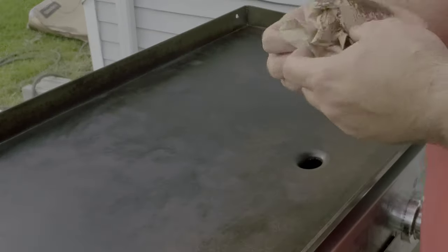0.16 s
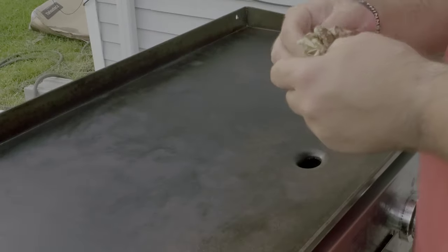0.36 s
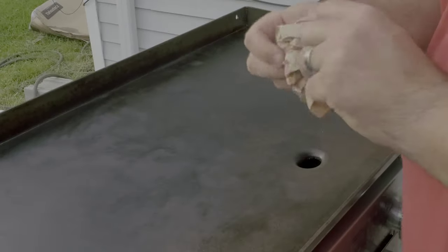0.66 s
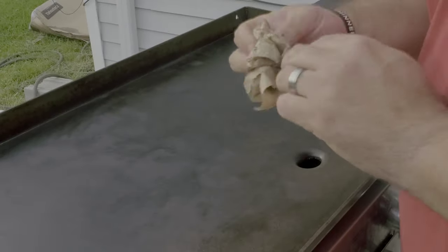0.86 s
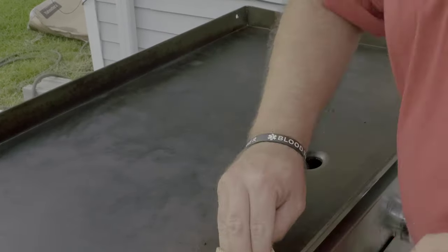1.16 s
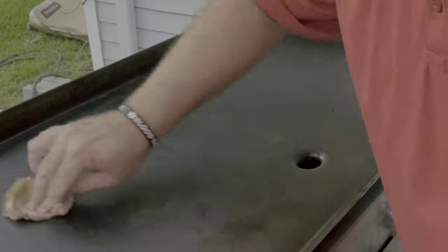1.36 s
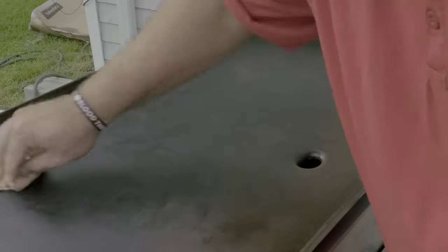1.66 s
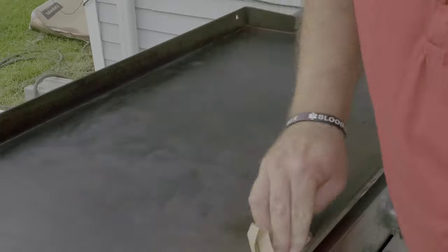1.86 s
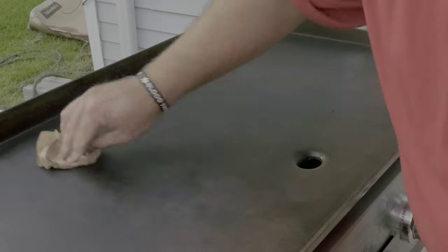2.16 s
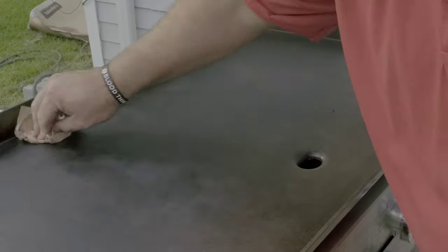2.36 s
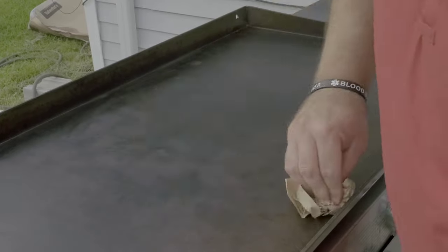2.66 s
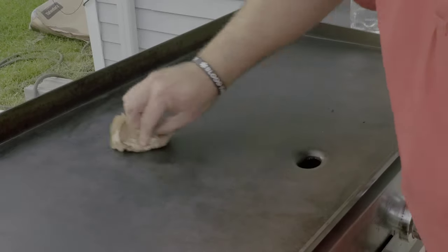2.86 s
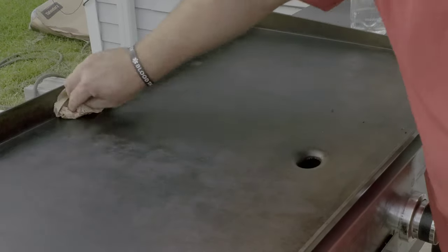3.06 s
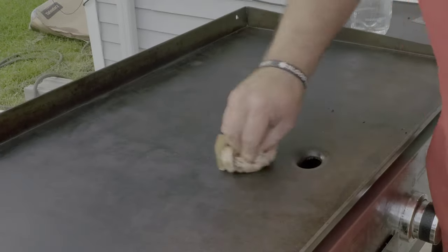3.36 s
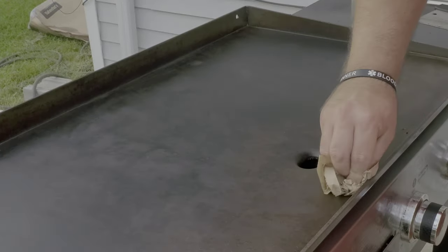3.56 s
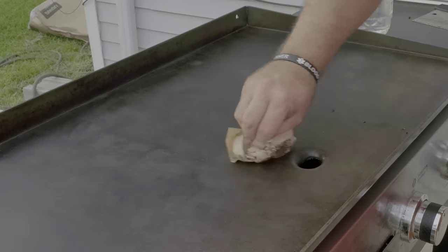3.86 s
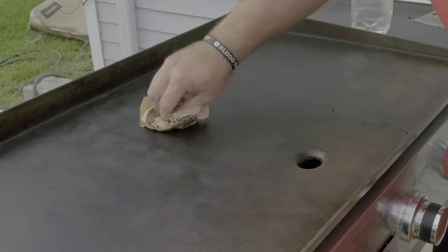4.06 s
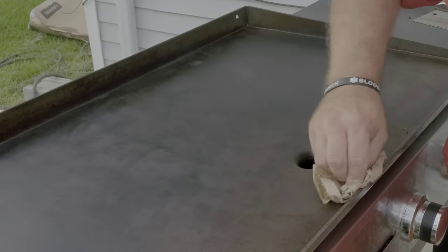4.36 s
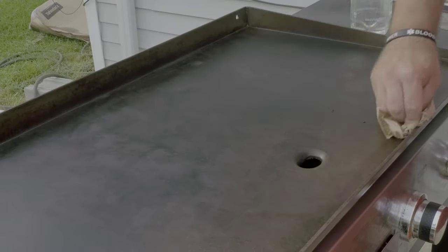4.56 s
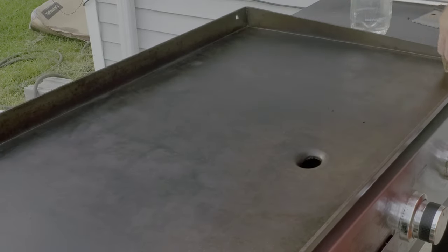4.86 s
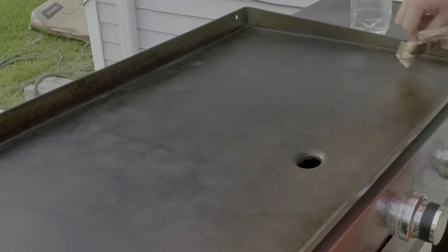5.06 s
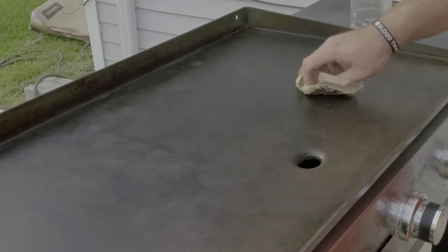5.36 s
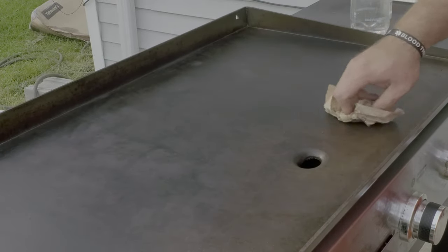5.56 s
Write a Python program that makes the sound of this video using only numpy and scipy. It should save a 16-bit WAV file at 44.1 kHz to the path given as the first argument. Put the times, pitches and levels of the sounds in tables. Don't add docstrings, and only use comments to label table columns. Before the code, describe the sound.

Close, dry outdoor sound: two hands crush a wad of paper towel with dense crackles, snaps and small crunches for just over a second. The wad then meets a steel cooking plate and rubs in short alternating strokes, each a breathy, papery hiss with a low scrape and slight shaking of the plate. A few creases still snap; later strokes become shorter and weaker over a very faint open-air floor.

```python
import sys
import numpy as np
from scipy import signal
from scipy.io import wavfile
from scipy.ndimage import uniform_filter1d, map_coordinates

SR = 44100
rng = np.random.default_rng(int(sys.argv[2]) if len(sys.argv) > 2 else 0)


def convert_level_to_amplitude(level_db):
    exponent = np.asarray(level_db, float) / 20
    return 10 ** exponent


def master_out(mix):
    frames = np.transpose(np.atleast_2d(mix))
    ceiling = np.clip(frames, -1, 1)
    pcm = np.round(ceiling * 32767).astype(np.int16)
    wavfile.write(sys.argv[1], SR, pcm)


N = 252252


def unit(x):
    return x / np.sqrt(np.mean(x ** 2) + 1e-20)


def along(points, hz):
    f, db = np.transpose(points)
    return np.interp(np.log(hz + 1), np.log(f + 1), db, left=-120, right=-120)


def steady(points):
    return lambda hz, t: along(points, hz) + 0 * t


def wobble(rate):
    knots = rng.standard_normal(int(N * rate / SR) + 4)
    return map_coordinates(knots, [np.arange(N) * rate / SR])


def slips(jerk_db, clump_db):
    size_db = jerk_db * wobble(900) + clump_db * wobble(70)
    return unit(rng.standard_normal(N) * convert_level_to_amplitude(size_db))


def tears(rate, size_db):
    lets_go = rng.random(N) < rate / SR
    return lets_go * rng.uniform(-0.98, 1, N) * convert_level_to_amplitude(size_db)


def shaped(x, gain_db, patchy_db):
    hz, t, z = signal.stft(x, SR, nperseg=512)
    patches = rng.standard_normal(z.shape)
    for axis in (0, 1):
        patches = uniform_filter1d(patches, size=14, axis=axis)
    gain = convert_level_to_amplitude(gain_db(hz[:, None], t) + patchy_db * unit(patches))
    gain = gain / np.sqrt(np.mean(gain ** 2, axis=0))
    return signal.istft(z * gain, SR, nperseg=512)[1][:N]


def bumps(rows, sudden=1):
    t = np.arange(0, N / SR, .001)
    s, length, *layers = np.transpose(rows)[..., None]
    bump = np.exp(-(2 * (t - s) / length * np.where(t < s, sudden, 1)) ** 2)
    return [np.interp(np.arange(N) / SR, t, np.sum(db * bump, axis=0)) for db in layers]


# frequency in Hz, density in dB per Hz.
AIR = [(28, -38), (84, 3.5), (274, -1.5), (500, -8.5), (4600, -12), (5750, 1), (7000, -11), (15700, -15)]


def air():
    return convert_level_to_amplitude(-79.5 + 0.8 * wobble(4.6)) * shaped(rng.standard_normal(N), steady(AIR), patchy_db=-2.5)


# frequency in Hz, density in dB per Hz.
RUMBLE = [(28, -36), (45, -11), (80, 1), (150, -5), (240, -4), (330, -27.5)]
DRUM = [(170, -35.5), (250, -3), (350, 4), (520, -0.5), (750, -5)]
# centre in seconds, length in seconds, extra rumble in dB, extra drum in dB.
LEANS = [(.48, 0.052, 3, 12), (1.1, 0.51, 1, 4), (1.28, 0.16, -2, -26), (1.58, 0.7, 1.5, 7),
         (2.38, 0.11, -2, 14), (2.51, 0.16, 2, 19), (2.74, 0.1, -2, 7.5), (2.95, 0.26, 4.5, 4),
         (3.36, 0.23, 7, -11), (3.79, 0.17, 1, 13), (3.94, 0.19, 8, 13), (4.14, 0.2, 6, 8),
         (4.66, 0.036, 13, 1), (5.04, 0.13, 4, 9.5), (5.61, 0.065, 4, 9)]


def plate(press_db, held):
    lean_db, push_db = bumps(LEANS)
    harder_db = press_db + 51
    rumble_db = -73 + 0.73 * harder_db + lean_db
    drum_db = -75 + 0.99 * harder_db + 10 * held + push_db + 0.5 * bumps(CRUNCHES)[0]
    rumble = convert_level_to_amplitude(rumble_db) * shaped(rng.standard_normal(N), steady(RUMBLE), patchy_db=-13.0)
    return rumble + convert_level_to_amplitude(drum_db) * shaped(slips(2, 2.2), steady(DRUM), patchy_db=3)


# frequency in Hz, density in dB per Hz.
BELLY = [(380, -32), (550, -6.5), (950, 5), (1400, -14)]
# centre in seconds, length in seconds, extra level in dB.
SCRAPES = [(.31, 0.071, 16), (.5, 0.027, 24), (.66, 0.12, 15), (.83, 0.055, 5), (1.55, 0.08, 11),
           (1.75, 0.33, 14), (2.33, 0.22, 12), (2.49, 0.062, 15), (3.32, 0.11, 23), (3.8, 0.17, 14.5),
           (3.92, 0.036, 22), (4.15, 0.17, 10), (5.6, 0.071, 7)]


def scrape(press_db):
    level_db = press_db - 19 + bumps(SCRAPES)[0]
    return convert_level_to_amplitude(level_db) * shaped(slips(1.1, 0.5), steady(BELLY), patchy_db=-0.5)


# centre in seconds, length in seconds,
# pitch in Hz, level in dB.
CAVITIES = [(1.483, .12, 4130, -48.5), (1.51, 0.28, 1250, -56), (2.072, .06, 8800, -69),
            (2.1, .09, 1500, -76.5), (2.45, 0.099, 8950, -71), (2.44, 0.054, 4500, -64),
            (3.34, 0.091, 7360, -51), (3.776, 0.28, 8950, -63), (3.75, 0.19, 4420, -55.5),
            (4.676, 0.27, 7970, -61), (4.8, 0.22, 10940, -71), (0.113, 0.085, 3160, -72),
            (2.3, .2, 1410, -62), (2.83, .07, 1410, -77)]


def cavities():
    q = 14
    hz, t, z = signal.stft(slips(1.5, 1.4), SR, nperseg=512)
    gain = 0
    for s, length, pitch_hz, db in CAVITIES:
        resonance = np.sqrt(SR * q / (np.pi * pitch_hz)) / (1 + (q * (hz[:, None] / pitch_hz - 1)) ** 2)
        gain = gain + convert_level_to_amplitude(db) * resonance * np.exp(-(2 * (t - s) / length) ** 4)
    return signal.istft(z * gain, SR, nperseg=512)[1][:N]


# start in seconds, peak in dB, pitch in Hz.
TICKS = [(0.326, -43, 6500), (.3785, -29, 8800), (0.5937, -32, 6550), (.7335, -29.5, 5800),
         (0.768, -28, 8460), (.7712, -29.5, 8200), (1.0374, -28, 8300), (1.2345, -31, 10000),
         (1.31, -38.5, 8500), (2.99, -25, 8500), (3.0085, -30.5, 8000), (3.2493, -40, 7000),
         (3.681, -38.5, 7000), (4.2065, -48, 9000), (5.0568, -36, 9540), (2.2145, -27, 8500)]


def ticks():
    out, t = np.zeros(N + SR), np.arange(100) / SR
    for (s, db, hz), turn in zip(TICKS, rng.random(len(TICKS))):
        u = t * hz / 1.3
        tick = np.sin(2 * np.pi * (hz * t + turn)) * u ** 2 * np.exp(2 - 2 * u)
        out[round(s * SR):][:len(t)] += convert_level_to_amplitude(db) * tick
    return out[:N]


TOUCHDOWN = 1.33
# start in seconds, peak in dB, pitch in Hz, crack in dB above the peak.
HAND_SNAPS = [(0.132, -29.5, 3180, -28), (0.1383, -17.5, 3640, -32), (0.049, -52, 3500, -20),
              (0.0687, -48, 3000, -20), (0.234, -42, 1490, -23), (0.2413, -44, 4000, -30),
              (0.2537, -27, 1380, -21), (0.327, -27, 1660, -22.5), (0.3982, -19.5, 2310, -15),
              (0.478, -32, 1410, -18), (0.548, -31, 2600, -11), (0.5943, -24.5, 2740, -7),
              (0.645, -40, 1360, -22), (0.6564, -28, 2360, -19), (0.679, -19, 2300, -5),
              (0.707, -20.5, 1360, -11), (0.733, -15, 3300, -13), (0.7663, -19, 1700, -13),
              (0.816, -13.5, 2200, -22.5), (0.8342, -15, 1560, -7), (0.846, -17, 2540, -17.5),
              (0.8596, -20, 2280, -2), (0.995, -16, 1760, -28), (1.0363, -22, 3000, -18),
              (1.1543, -23, 3620, -12), (1.2052, -29, 2540, -17), (1.234, -34, 1290, -7.5),
              (0.2586, -26, 1360, -13), (0.271, -26, 1100, -17), (0.307, -20.5, 1620, -17),
              (0.313, -34, 1800, -13), (0.349, -34, 1800, -6), (0.4892, -33, 1500, -13),
              (0.495, -27, 1280, -9), (0.638, -34, 1350, -14), (0.9128, -19.5, 2150, -10.5),
              (0.973, -23, 1910, -11.5), (0.98, -16.5, 2120, -10), (1.193, -25, 2200, -21),
              (1.261, -20.5, 1270, -13), (1.273, -27.5, 1420, -20)]
PLATE_SNAPS = [(1.31, -36, 1700, -12), (1.346, -29, 1900, -13), (1.6115, -24, 2500, 0),
               (1.617, -47, 1820, -3), (2.1465, -43, 1500, -6), (2.4875, -31, 2010, -6),
               (2.879, -34.5, 2000, -1), (2.948, -27, 1620, -20), (2.958, -23, 2010, -19),
               (2.962, -19.5, 2110, -20), (1.723, -25, 4430, -21), (1.73, -28, 1970, -12),
               (3.167, -28, 1290, -13), (3.181, -29.5, 2460, -28), (3.23, -38, 2300, -25),
               (3.249, -39, 2290, -15), (3.2845, -30, 1620, -6), (3.682, -28, 2220, -22),
               (3.91, -25.5, 1730, -17), (4.1145, -23, 4430, -19), (4.184, -36, 2530, -9),
               (4.2934, -19.5, 3340, -23), (4.4285, -15, 2800, -14), (4.491, -19, 2480, -21),
               (4.597, -19.5, 3230, -16), (4.965, -40, 2500, -10.5), (4.979, -36, 2000, -20),
               (4.9973, -28.5, 3090, -29), (5.0156, -28.5, 2300, -6), (5.031, -34, 1060, -20),
               (5.0277, -29.5, 2500, -18), (5.0428, -22.5, 2870, -16), (5.0566, -20.5, 2720, -6.5),
               (5.0784, -27, 3000, -28), (5.153, -42.5, 3500, -16), (5.4145, -24.5, 3300, -16),
               (5.4207, -41.5, 2500, -26)]
# start in seconds, peak in dB.
THUMPS = [
    (0.657, -30),
    (0.834, -24),
    (1.73, -46),
    (3.912, -36),
]


def swelling_ring(t, hz, cycles, turn):
    u = t * hz / cycles
    return np.sin(2 * np.pi * (hz * t + turn)) * u ** 3 * np.exp(3 - 3 * u)


def snaps():
    out, t = np.zeros(N + SR), np.arange(400) / SR
    rows = HAND_SNAPS + PLATE_SNAPS
    chance = rng.random((len(rows), 5))
    rasps = signal.lfilter(*signal.butter(4, 6500, fs=SR), rng.standard_normal((len(rows), len(t))))
    for (s, db, hz, crack_db), c, rasp in zip(rows, chance, rasps):
        held = s < TOUCHDOWN
        snap = swelling_ring(t, hz, 0.98, c[0])
        snap += convert_level_to_amplitude(crack_db + 10.0 - 5 * held) * swelling_ring(t, 5300 + 1300 * c[1], 0.67, c[1])
        snap += convert_level_to_amplitude(crack_db - 19 - 2 * held) * swelling_ring(t, 8300 + 2000 * c[2], 0.87, c[3])
        snap += convert_level_to_amplitude(-10.5) * swelling_ring(t, 1.44 * hz, 2.0, c[4])
        snap += convert_level_to_amplitude(-19 - 60 * t / 0.0044) * rasp
        snap = signal.lfilter(*signal.butter(3, [0.66 * hz, 10500], 'band', fs=SR), snap)
        out[round((s + .0004) * SR):][:len(t)] += convert_level_to_amplitude(db - 8.5) * snap
    for s, db in THUMPS:
        out[round(s * SR):][:len(t)] += convert_level_to_amplitude(db) * swelling_ring(t, 636, 0.46, 0.5)
    return out[:N]


def motions(rows, law, t):
    rise, fall, swell_db, follows, crease_db, crease_swell_db, crease_follows, *fine_db = law
    s, end, first_db, last_db, press_db = np.transpose(rows)[..., None]
    u = np.clip((t - s) / (end - s), 0, 1)
    edge = -rise * np.maximum(s - t, 0) - fall * np.maximum(t - end, 0)
    dull_edge = 0.79 * edge
    slide = (last_db - first_db) * (u - .5)
    arch = 4 * u * (1 - u)
    fizz = (first_db + last_db) / 2 + slide + swell_db * arch + edge
    body = press_db + follows * slide + dull_edge
    crease = press_db + crease_db + crease_follows * slide + crease_swell_db * arch + dull_edge
    fine = fizz + np.interp(u, [0, 0.66, 1], fine_db)
    return np.sum(convert_level_to_amplitude([fizz, body, crease, fine]) ** 2, axis=1)


# start in seconds, end in seconds,
# fibre fizz in dB at the start, at the end, pressure in dB.
RUSTLES = [(0.0, .12, -91, -92, -83), (.15, .21, -74.5, -84, -68.5), (.53, .625, -65, -79, -65),
           (1.18, 1.22, -63, -65, -53.5), (1.3, 1.35, -71, -57, -63.5), (1.65, 1.7, -75, -80, -69.5),
           (2.04, 2.12, -68, -72, -70), (2.42, 2.47, -69, -73, -58), (2.81, 2.86, -68, -86, -72),
           (3.19, 3.27, -70, -79, -72), (3.61, 3.65, -64, -69, -65.5), (4.06, 4.1, -60, -62, -66),
           (5.075, 5.21, -68, -89, -78.5), (5.365, 5.43, -88, -80.5, -81), (5.46, 5.52, -76, -73, -65)]
# rise in dB/s, fall in dB/s, fizz swell in dB, share of the fizz slide in the
# body, crease in dB over pressure, crease swell in dB, share of the fizz slide in the crease,
# fine hiss in dB over fizz at the start, at its top, at the end.
RUSTLING = (444, 455, 2, 0.81, -1, -2.5, 0.74, -17, -20, -32)
# time in seconds, opening in dB.
OPENING = [(0, -14), (.6, 5.5), (.95, -1.5), (1.04, -11), (1.1, -4), (1.35, -2), (1.55, 5.5), (2.38, 1),
           (2.5, 7), (2.75, 0.5), (3.33, 4), (3.5, -3.5), (3.8, 1), (4.05, 4), (4.6, -0.5), (4.78, -17.5),
           (5.0, -8.5), (5.6, -5.5)]


def effort(*kinds):
    t = np.arange(0, N / SR, .001)
    power = sum(motions(rows, law, t) for rows, law in (*kinds, (RUSTLES, RUSTLING)))
    opening_db = np.interp(t, *np.transpose(OPENING))
    db = 10 * np.log10(power + 1e-11) + np.outer([0, 0, -0.29, 1], opening_db)
    return [np.interp(np.arange(N) / SR, t, d) for d in db]


# frequency in Hz, density in dB per Hz.
FINE = [(8200, -56.5), (9800, -1), (12000, -1.5), (14000, -3.5), (15600, -7.5)]
# time in seconds, resonance in Hz.
FINGERS = [(0, 11000), (1.0, 11000), (1.25, 9800), (1.42, 10200), (1.57, 11200), (1.78, 12500),
           (1.92, 10200), (2.2, 10800), (2.36, 12200), (2.5, 12700), (2.72, 10300), (2.95, 10800),
           (3.13, 12400), (3.32, 9900), (3.52, 11000), (4.3, 11300), (4.8, 11000), (5.6, 10300)]


def airy(tilt_db):
    def octaves_above(hz, edge_hz):
        return np.log2(np.maximum(hz, edge_hz) / edge_hz)

    def colour(hz, t):
        slit_hz = np.interp(t, *np.transpose(FINGERS))
        slit_db = 9 / (1 + ((hz - slit_hz) / 1700) ** 2)
        opening_db = 0.8 * np.interp(t, *np.transpose(OPENING))
        tilt = tilt_db * octaves_above(hz, 13200) + opening_db * octaves_above(hz, 11000)
        return along(FINE, hz) + slit_db + tilt

    return colour


def moving(points, t_grip, centre_hz, width_hz):
    def colour(hz, t):
        off = (hz - np.interp(t, t_grip, centre_hz)) / width_hz
        return along(points, hz) - 10 * np.log10(0.028 + 1 - 1 / (1 + off ** 2))

    return colour


# frequency in Hz, density in dB per Hz.
FIZZ = [(4500, -32.5), (6200, 1), (9600, 0), (11000, -19.5)]
CREASE = [(1800, -27.5), (2600, -5), (5700, 1.5), (7500, -39.5)]
# time in seconds, resonance in Hz of the hollow under the hand, of the pockets.
GRIP = [(0, 8750, 4020), (1.0, 8440, 4010), (1.15, 7500, 3400), (1.55, 7850, 4400), (1.78, 6170, 4860),
        (1.92, 8000, 4170), (2.25, 8400, 4170), (2.5, 6440, 4480), (2.65, 8700, 4650), (3.0, 7960, 4170),
        (3.3, 7040, 4100), (3.5, 8700, 4330), (3.8, 8500, 4050), (4.0, 6500, 4650), (4.28, 8740, 3870),
        (4.5, 5800, 3850), (5.1, 6920, 3200), (5.6, 8000, 4260)]
# centre in seconds, length in seconds, extra wad and crease in dB, extra fizz in dB.
CRUNCHES = [(0.171, 0.024, 9.5, 8), (0.262, 0.018, 13, 10), (0.309, 0.025, 8, 10.5),
            (0.325, 0.031, 5.5, 6.5), (0.379, 0.0053, 12, 10.5), (0.402, 0.021, 9.5, 6),
            (0.472, 0.0057, 1, 6), (0.494, 0.015, 8.5, 7), (0.644, 0.02, 5.5, 2.5), (0.658, 0.011, 2, 5.5),
            (0.774, 0.014, 5, 10), (0.823, 0.04, 4, 5), (0.855, 0.037, 1, 3), (0.914, 0.0084, 8, 14),
            (0.988, 0.04, -1.5, 3.5), (1.038, 0.0062, -1, 13), (1.261, 0.015, 4.5, 5.5),
            (1.276, 0.0042, 0, -2), (1.617, 0.014, 12, 6), (1.994, 0.01, 6, -13), (2.22, 0.057, 7.5, 5.5),
            (2.492, 0.036, 8, 3.5), (2.957, 0.036, 7, 2.5), (3.167, 0.02, 10, 4), (3.328, 0.063, 2.5, 3),
            (3.52, 0.0099, 0, 6), (3.918, 0.0096, 4, 8), (4.5, 0.018, 7, 3), (5.044, 0.034, 1.5, -6)]
# centre in seconds, length in seconds, extra crease in dB, extra wad in dB.
POCKETS = [(.3, 0.2, -1.5, 3.5), (.45, 0.079, 5, 5), (.95, 0.055, 4, -4.5), (1.02, 0.11, 3.5, 0.5),
           (1.12, 0.092, 7, -1.5), (1.25, 0.04, 6, -0.5), (1.46, 0.059, 2, -2), (1.58, 0.12, 2, -7.5),
           (1.79, 0.1, 5.5, 1), (1.89, 0.095, 8, 5.5), (2.09, 0.07, 7, -8), (2.2, 0.24, -4.5, -7),
           (2.3, 0.06, 1, -1.5), (2.54, 0.056, 5, 5), (2.64, 0.048, 6.5, 2), (2.75, 0.079, 1, -3),
           (2.955, 0.02, 0, 6.5), (3.1, 0.28, -2.5, -4.5), (3.167, 0.017, -15, -3), (3.21, 0.079, -3, 6),
           (3.33, 0.096, -1, 5.5), (3.45, 0.18, 6, 4), (3.6, 0.11, 1, -3), (3.77, 0.11, 4.5, 3),
           (4.0, 0.033, 0.5, 4.5), (4.22, 0.13, 1.5, -7.5), (4.4, 0.15, 2, 1), (4.7, 0.1, 2, 2),
           (4.9, 0.15, -1, -4.5), (5.035, 0.06, -4, 4.5), (5.135, 0.03, 12, 2), (5.18, .06, 10.5, -2),
           (5.38, 0.056, 7, -4), (5.48, 0.1, 3.5, -14.5), (5.6, 0.23, -0.5, 2.5)]
# centre in seconds, length in seconds, extra fizz in dB, extra fine hiss in dB.
PALM = [(.05, .12, 1, -8), (.28, 0.042, 4, 11), (.43, 0.076, 2, 2), (.68, 0.081, 2.5, -3),
        (.75, 0.048, 6, 3), (.95, .03, -3, -15), (1.01, 0.071, 0.5, 8), (1.12, 0.092, 2, -5),
        (1.25, .05, 2, -4), (1.42, 0.15, 4, 3), (1.675, 0.035, 1, 3), (1.8, 0.067, 1, 2),
        (1.97, 0.053, -3, -4), (2.08, 0.043, 2, 7), (2.3, 0.1, 1, 1.5), (2.54, .08, 3, 7),
        (2.68, 0.067, 1.5, -6), (2.92, 0.094, -1, 4), (3.1, .08, 4, -3), (3.36, 0.11, 0, -2),
        (3.56, 0.12, -0.5, 10), (3.63, .04, -2, 6), (3.78, 0.2, -1.5, -7), (4.0, 0.042, 0.5, -8),
        (4.14, .05, -5, -9), (4.28, 0.2, 4.5, -4), (4.55, .12, -0.5, -3), (4.8, 0.13, -1, -3),
        (4.95, .06, -2.5, -11), (5.12, .06, 1, 1), (5.47, .05, 3.5, 1), (5.55, 0.043, 7, 13),
        (4.08, 0.071, -2.5, 8)]


def towel(levels, wad, rub, tear_rate, tear_db, patchy_db, width_hz, tilt_db):
    fizz_db, body_db, crease_db, fine_db = levels
    t_grip, hollow_hz, pocket_hz = np.transpose(GRIP)
    low_db, high_db = bumps(CRUNCHES, sudden=0.97)
    pocket_db, wad_db = bumps(POCKETS)
    lift_db, slit_db = bumps(PALM)

    def part(db, colour, dull_db):
        friction = unit(rub + tears(tear_rate, tear_db - dull_db))
        return convert_level_to_amplitude(db) * shaped(friction, colour, patchy_db)

    hollow = moving(FIZZ, t_grip, hollow_hz, width_hz)
    pockets = moving(CREASE, t_grip, pocket_hz, 0.8 * width_hz)
    high = part(fizz_db + lift_db, hollow, dull_db=-2.5)
    high += part(fine_db + slit_db, airy(tilt_db), dull_db=1)
    low = part(body_db + wad_db, steady(wad), dull_db=1.5)
    low += part(crease_db + pocket_db, pockets, dull_db=-2.5)
    return convert_level_to_amplitude(low_db) * low + convert_level_to_amplitude(high_db) * high


# frequency in Hz, density in dB per Hz.
WAD_SQUEEZED = [(380, -8), (600, -1.5), (1000, 0), (1300, 4), (2200, 4.5), (3200, -5.5), (4200, -30.5)]
# start in seconds, end in seconds,
# fibre fizz in dB at the start, at the end, pressure in dB.
SQUEEZES = [
    (.256, .44, -64.5, -58, -55.5),
    (.474, .505, -54.5, -61, -52),
    (.645, .77, -56, -58, -47.5),
    (.785, .925, -50, -53.5, -44.5),
    (.935, .96, -56.5, -54.5, -46.5),
    (.977, 1.04, -45, -55, -44),
    (1.05, 1.17, -51, -53.5, -45.5),
    (1.235, 1.27, -43, -50.5, -47),
]
SQUEEZING = (661, 600, 1, 1.02, -7.5, 0, 0.55, -6.5, -3.5, -1.5)


def squeeze(levels):
    rub = slips(3.0, 1.14) + tears(60, 12)
    return towel(levels, WAD_SQUEEZED, rub, tear_rate=350, tear_db=13.0, patchy_db=1.5,
                 width_hz=4900, tilt_db=-40)


# frequency in Hz, density in dB per Hz.
WAD_WIPED = [(380, -29), (600, -11), (900, -4), (1300, 1.5), (1700, 2), (2600, -3), (4200, -21)]
# start in seconds,
# end in seconds, fibre fizz in dB at the start, at the end, pressure in dB.
PUSHES = [
    (1.38, 1.625, -43.5, -52, -51),
    (2.152, 2.4, -47.5, -51, -51),
    (2.895, 3.155, -49, -57, -53),
    (4.25, 4.44, -55, -49.5, -48.5),
    (5.012, 5.058, -59, -57, -56),
    (5.535, 5.71, -59, -52.5, -51.5),
]
PULLS = [
    (1.732, 2.007, -50.5, -44.5, -54.5),
    (2.487, 2.785, -46.5, -57.5, -53),
    (3.287, 3.58, -48, -56, -55.5),
    (3.915, 4.04, -65, -53.5, -52),
    (4.115, 4.165, -49.5, -60.5, -54.5),
]
DRAGS = [
    (3.675, 3.89, -55.5, -60, -56),
    (4.455, 4.625, -49, -54, -52.5),
    (4.635, 4.88, -57.5, -54, -60),
    (4.9, 4.98, -61, -60, -62.5),
]
PUSHING = (639, 564, 7, 0, -1.5, 4, 0.1, -10.5, -3, -8)
PULLING = (1200, 800, 6.5, 0, -3, 6.5, 0.85, -20, 1, -15)
DRAGGING = (600, 598, 1, 1.03, -1, 0.2, -0.2, -6, -7, -4.5)


def wipe(levels):
    rub = slips(0.81, 1.0) + tears(25, 13)
    return towel(levels, WAD_WIPED, rub, tear_rate=150, tear_db=14.0, patchy_db=1.6,
                 width_hz=6800, tilt_db=11.5)


def scene():
    held = effort((SQUEEZES, SQUEEZING))
    wiped = effort((PUSHES, PUSHING), (PULLS, PULLING), (DRAGS, DRAGGING))
    landed = np.clip((np.arange(N) / SR - TOUCHDOWN) / .01, 0, 1)
    in_hands = 1 - landed
    rubbing = squeeze(held) * in_hands + wipe(wiped) * landed
    crack = snaps()
    bounce = convert_level_to_amplitude(-33.0) * np.pad(crack, (35, 0))[:N]
    press_db = held[1] * in_hands + wiped[1] * landed
    shake = plate(press_db, in_hands) + scrape(press_db)
    return (rubbing + crack + bounce + shake + air() + ticks() + cavities())[None]


def band_limit(x):
    return signal.sosfilt(signal.butter(12, 15710, fs=SR, output="sos"), x)


def record(dry):
    return band_limit(dry)


dry = scene()
out = record(dry)
master_out(out)
```